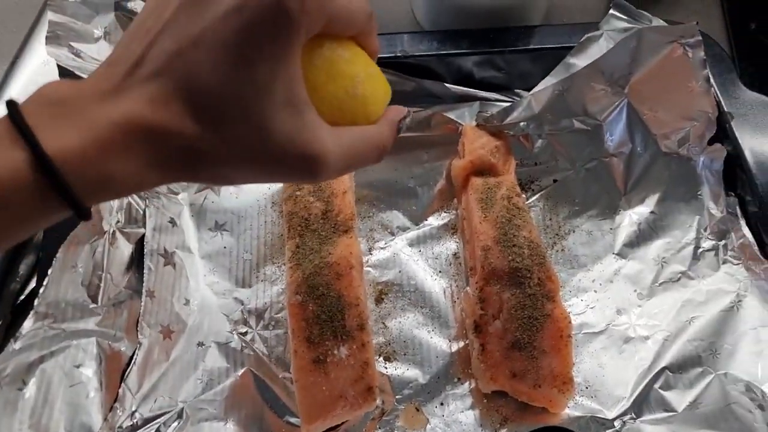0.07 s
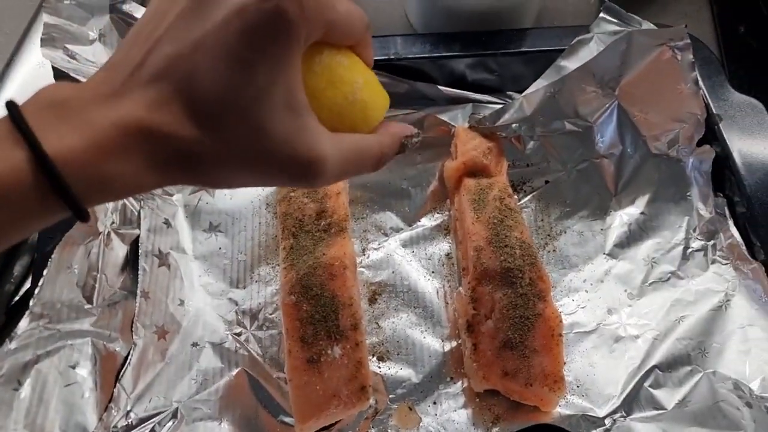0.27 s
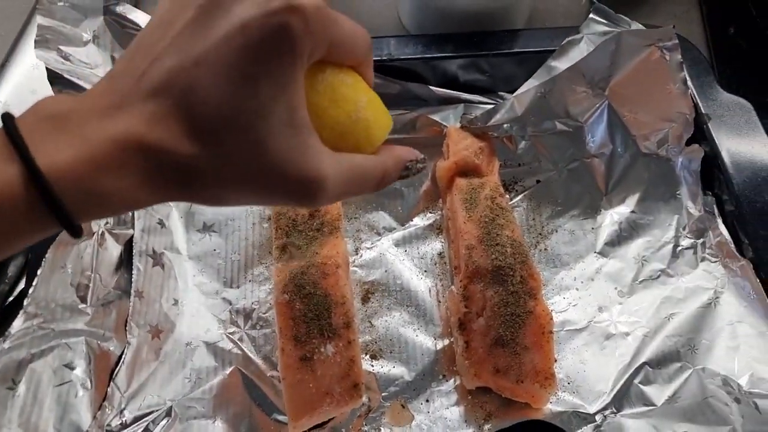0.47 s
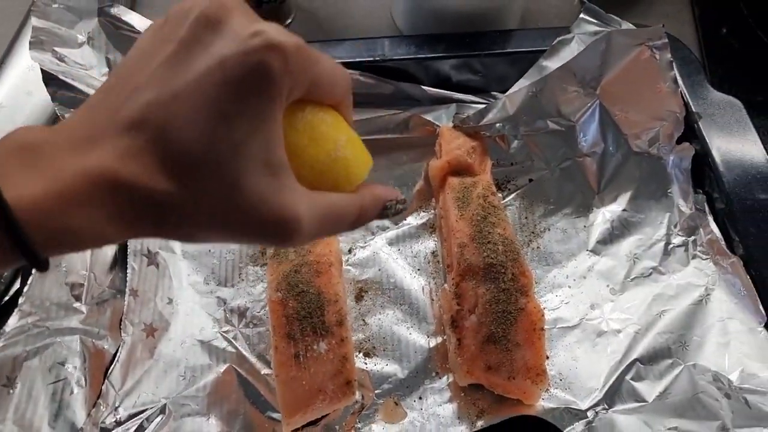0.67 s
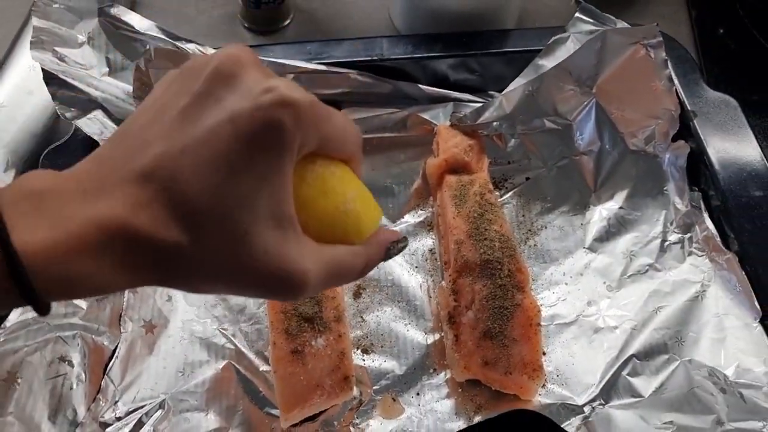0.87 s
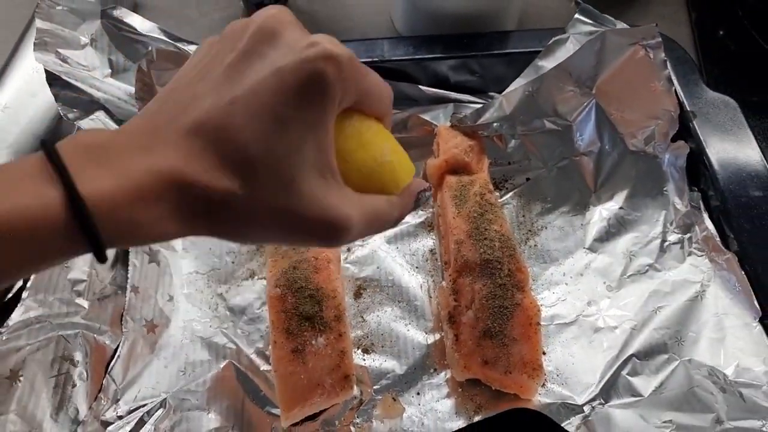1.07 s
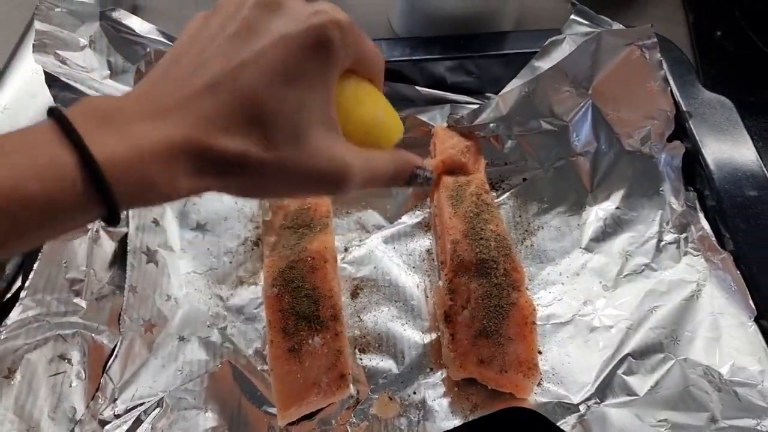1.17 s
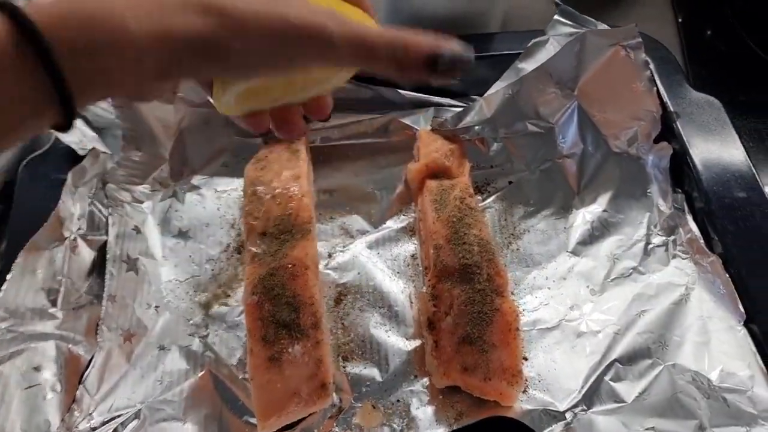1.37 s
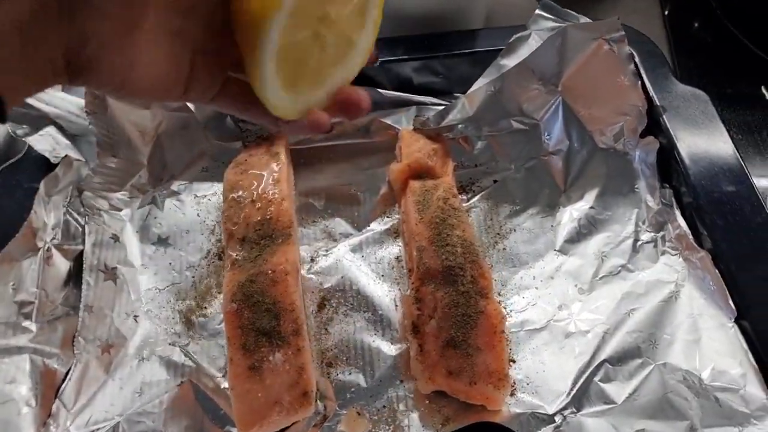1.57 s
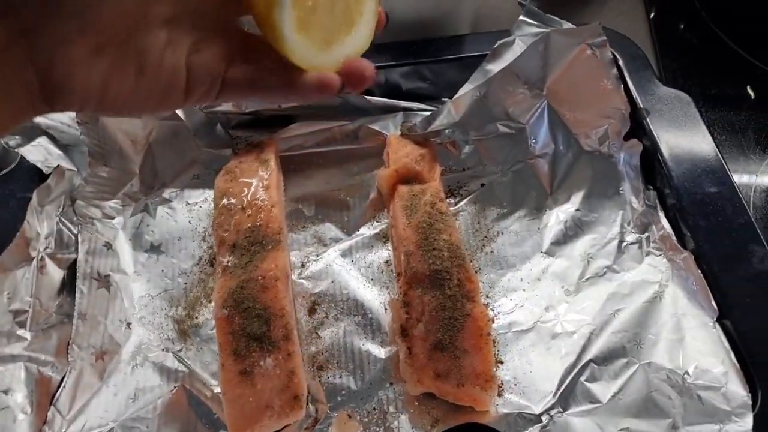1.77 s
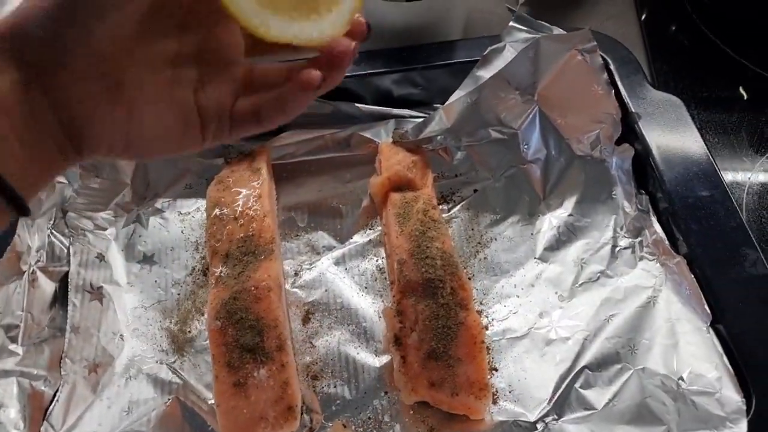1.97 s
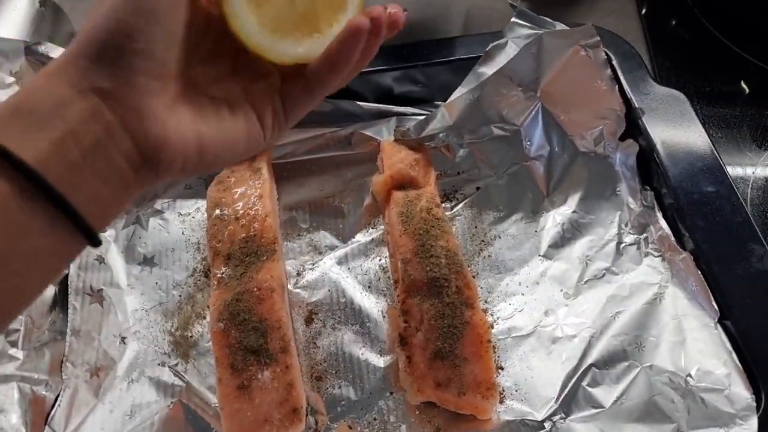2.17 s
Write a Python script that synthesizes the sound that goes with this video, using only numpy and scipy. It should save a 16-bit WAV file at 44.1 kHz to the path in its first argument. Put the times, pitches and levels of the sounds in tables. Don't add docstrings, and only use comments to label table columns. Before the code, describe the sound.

Lemon juice drips and crackles onto crumpled aluminium foil in a tray, over a faint low hum

```python
import sys
import numpy as np
from scipy import signal
from scipy.fft import rfft, irfft, next_fast_len
from scipy.io import wavfile
from scipy.ndimage import uniform_filter1d, map_coordinates

SR = 44100
rng = np.random.default_rng(int(sys.argv[2]) if len(sys.argv) > 2 else 0)


def dump(signal):
    limited = np.clip(np.atleast_2d(signal).T, -1, 1)
    pcm = np.round(limited * 32767).astype(np.int16)
    wavfile.write(sys.argv[1], SR, pcm)


def boost_factor(decibels):
    exponent = np.asarray(decibels, float) / 20
    return 10 ** exponent


N = 98254
SPAN = SR * 2 // 5

# multiple_of_motor_hz, level_db
MOTOR_LINES = [(1, -62), (3, -56), (4, -81), (5, -81.5), (6, -91.5), (9, -79), (11, -79), (12, -83.5),
               (13, -89.5), (14, -92.5)]
# pitch_hz, width_hz, level_db
ROOM_MODES = [(33, 5, -5), (53.7, 7, -3), (77, 7, 0), (98, 12, -9), (133, 22, -19), (345, 9, -25)]
# pitch_hz, likeness_0_to_1
LIKENESS = [(30, .93), (60, 1), (130, .94), (290, 0.6), (640, 0.62), (2000, 0.061)]
# pitch_hz, level_db_per_hz
MURMUR = [(110, -110), (160, -99), (250, -99), (400, -95.5), (630, -103), (1000, -107), (1600, -112)]
# pitch_hz, level_db_per_hz
HISS_CURVE = [(900, -125), (1300, -111), (2000, -115), (3000, -115), (5500, -117), (7400, -129),
              (9000, -128), (10500, -134), (13300, -137), (15500, -132)]
# time_s, level_db
SQUEEZE_LEVEL = [
    (0.0, -47),
    (0.658, -41),
    (0.77, -42),
    (0.9, -47),
    (0.98, -39.5),
    (1.118, -65),
    (1.244, -70),
    (1.45, -78),
]
# pitch_hz, share_0_to_1
SHARED_PART = [(500, 0.87), (1500, 0.52), (4000, 0.23), (12000, 0.12)]
# pitch_hz, t60_s
KITCHEN_T60 = [(500, .38), (3000, .32), (8000, .28), (15000, .2)]
# start_s, level_db, spread_s, foil_note_hz, brightness_db
FOIL_DROPS = [(0.0014, -42.5, 0.03, 2030, -1), (0.032, -34.5, 0.034, 5050, -5.5),
              (0.1143, -35.5, 0.019, 2340, -1.5), (0.2052, -35, 0.0077, 2370, 2),
              (0.2732, -42, 0.016, 3050, -23), (0.3413, -25.5, 0.0036, 1750, 7),
              (0.401, -28.5, 0.022, 4160, 5.5), (0.4236, -32, 0.0093, 5160, -2),
              (0.5155, -29.5, 0.026, 4970, 7.5), (0.5342, -33.5, 0.024, 3040, 2.5),
              (0.663, -29.5, 0.012, 3000, 9), (1.4022, -50, 0.01, 2010, -6), (1.4605, -40, 0.022, 1960, 0),
              (1.5509, -40.5, 0.02, 3950, 6), (1.5654, -27, 0.0019, 4720, 9),
              (1.5804, -38.5, 0.0038, 3030, 7.5), (1.6357, -59, 0.008, 6000, 10),
              (1.8476, -41.5, 0.007, 2190, 1.5), (1.884, -54, .005, 7000, 18),
              (1.903, -61, 0.0031, 8000, 19), (0.6, -47, 0.0055, 2810, 0)]
# start_s, level_db, spread_s, foil_note_hz, brightness_db
FOIL_RUNNELS = [
    (0.091, -38, 0.023, 2980, 9),
    (0.156, -29, 0.0086, 5000, -3.5),
    (0.252, -32.5, 0.01, 2724, 8),
    (.32, -30.5, 0.034, 3480, -2),
    (0.584, -37, 0.031, 2700, 0),
    (0.797, -25.5, 0.019, 2700, 0),
    (1.329, -44, 0.0055, 2000, -5),
    (1.359, -57.5, 0.031, 3980, 0),
    (1.499, -48, 0.0083, 2560, 8),
    (1.835, -43.5, 0.015, 1950, -18),
]
# pitch_hz, level_db_per_hz
FOIL_TONE = [(180, -43), (300, -11), (590, -18.5), (708, -6), (849, -11.5), (1730, -6.5), (3070, -2.5),
             (7750, -6), (15500, -21.5)]
# start_s, level_db, pitch_hz, t60_s
DENT_POPS = [(0.049, -51.5, 1155, 0.12), (0.342, -40.5, 1786, 0.078), (.345, -44, 1230, 0.064),
             (.345, -65, 780, .04), (.36, -48, 2060, 0.051), (.42, -50.5, 2057, 0.066),
             (.425, -49, 1094, 0.046), (.425, -60, 694, 0.044), (.522, -64, 990, 0.034),
             (.527, -43.5, 2280, 0.042), (.548, -58, 714, 0.054), (.555, -50, 1200, 0.079),
             (.563, -47.5, 1690, 0.053), (.665, -43, 3150, 0.036), (.718, -52, 1170, 0.037),
             (0.744, -41.5, 1164, 0.07), (.746, -48, 732, 0.051), (.748, -43.5, 1340, 0.057),
             (.804, -40, 2750, 0.037), (.8148, -27.5, 4900, 0.03), (0.8139, -28.5, 2620, 0.033),
             (.822, -47, 1250, .06), (0.8885, -36, 5010, 0.021), (.891, -47.5, 1200, 0.08),
             (1.193, -52.5, 2940, 0.055), (1.27, -64, 4930, 0.02), (1.282, -51, 6320, .02),
             (1.29, -55, 4870, 0.026), (.058, -48, 2180, .05), (.115, -57, 2700, .04),
             (.342, -47, 3970, .03), (.515, -41.5, 4970, .03), (.95, -38, 5000, .03),
             (1.005, -55, 5000, .03), (1.18, -56, 14600, .02), (1.195, -60, 9500, .015),
             (1.205, -54, 9000, .015), (1.179, -58, 7000, .02), (0.171, -52, 1160, .05),
             (.09, -54, 1144, 0.066), (.055, -57, 520, .05), (1.48, -62, 520, .05),
             (1.336, -65, 1994, 0.05), (1.402, -70.5, 2030, 0.15), (1.465, -59, 1987, 0.12),
             (1.475, -58, 1616, .07), (1.565, -45.5, 1750, 0.07), (1.568, -54, 1045, .04),
             (1.572, -49.5, 1990, 0.089), (1.574, -47, 3335, 0.076), (1.597, -61, 940, 0.055),
             (1.608, -58, 2720, 0.076), (1.849, -61, 2130, 0.032)]
# start_s, level_db, spread_s, low_ring_db, brightness_db
DROPS_ON_TRAY = [(0.7444, -31.5, 0.02, 18.5, 0.5), (0.7854, -32.5, 0.019, -14, 9),
                 (0.814, -22, 0.0067, 9, 10), (0.8224, -27, 0.0047, 11, -30), (0.8901, -28.5, 0.015, 1, -2),
                 (0.9142, -31, 0.023, 5, -6), (0.9473, -33, 0.016, 17, 2), (0.971, -35.5, 0.019, -6, -5),
                 (1.0042, -35.5, 0.014, 11, -1), (1.0404, -36.5, 0.017, 1, -24),
                 (1.0548, -33, 0.0083, 10, 1.5), (1.0795, -38.5, 0.0063, -2, 8),
                 (1.1697, -47, 0.0093, -12, -6.5), (1.178, -43, 0.005, -27, 5),
                 (1.1935, -42.5, 0.0045, -16, 7), (1.2048, -45.5, 0.005, -26, 6),
                 (1.2448, -50.5, 0.0097, -6, -4), (1.28, -55.5, 0.01, -20, -1),
                 (1.095, -51, 0.0089, 0, -17)]
# pitch_hz, level_db_per_hz
TRAY_TONE = [(180, -51), (300, -20), (821, -16.5), (1160, -12.5), (1490, -10.5), (2610, -5.5), (4000, -6),
             (4960, -5.5), (15500, -20.5)]
# pitch_hz, width_hz, level_db
TRAY_NOTES = [(1200, 190, -6), (2700, 500, -16.5), (4800, 390, -4)]
# pitch_hz, left_over_right_db
BALANCE = [(60, 5), (150, -7), (380, -1.5), (950, 2.5), (2380, -2), (5980, -0.5), (15000, 0)]

ROOM_DB = -5.5
BRIGHT_HZ = 6950
ATTACK_S, SWELL_S = 0.00089, 0.015


def unit(x):
    return x / np.sqrt(np.mean(x ** 2, axis=-1, keepdims=True) + 1e-20)


def along(points, hz):
    pitch, value = np.transpose(points)
    return np.interp(np.log(hz + 1), np.log(pitch + 1), value)


def peak(f, hz, width):
    return 1j * f * width / (hz * hz - f * f + 1j * f * width)


def wobble(rate):
    bends = rng.standard_normal(int(N * rate / SR) + 4)
    return map_coordinates(bends, [np.arange(N) * rate / SR])


def filtered(x, response):
    size = next_fast_len(x.shape[-1] + SR // 2)
    spectrum = rfft(x, size) * response(np.fft.rfftfreq(size, 1 / SR))
    return irfft(spectrum, size)[..., :x.shape[-1]]


def stereo(response):
    def mid_and_side(hz):
        turn = np.arccos(np.clip(along(LIKENESS, hz), -1, 1)) / 2
        return response(hz) * [np.cos(turn), np.sin(turn)]

    mid, side = filtered(rng.standard_normal((2, N)), mid_and_side)
    return np.array([mid + side, mid - side])


def machine():
    motor_hz, unsteady_db, boom_db = 33.31, 2.5, -50.5
    t = np.arange(N) / SR
    hum = np.zeros(N)
    for multiple, db in MOTOR_LINES:
        level = np.sqrt(2) * boost_factor(db + unsteady_db * wobble(8.6))
        hum += level * np.sin(2 * np.pi * (multiple * motor_hz * t + rng.random()))
    modes = lambda f: sum(boost_factor(db) * np.abs(peak(f, hz, width)) ** 2 for hz, width, db in ROOM_MODES)
    return hum + boost_factor(boom_db) * unit(stereo(modes))


def air():
    murmur = stereo(lambda f: boost_factor(along(MURMUR, f)) / (1 + (f / 1800) ** 4))
    hiss = stereo(lambda f: boost_factor(along(HISS_CURVE, f)))
    return np.sqrt(SR / 2) * (murmur + hiss)


def ports(near, apart):
    lead_s = 0.0003943
    share = lambda f: np.clip(along(SHARED_PART, f), 0, 1)
    shift = lambda f: np.exp(1j * np.pi * lead_s * np.outer([1, -1], f))
    common = filtered(near, lambda f: np.sqrt(share(f)) * shift(f))
    return common + filtered(apart, lambda f: np.sqrt(1 - share(f)))


def spray():
    rate, centre_hz, pitch_spread, cycles, size_db, spray_db = 1300, 6000, 0.661, 5.1, 1.5, -15
    s, level_db = np.transpose(SQUEEZE_LEVEL)
    count = int(rate * s[-1])
    when, pitch, size = rng.random((3, 3, 1500))[:, :, :count, None]
    start = (when * s[-1] * SR).astype(int)
    hz = np.clip(centre_hz * np.exp(pitch_spread * 4.01 * (pitch - .5)), 800, 15500)
    k = np.arange(256)
    strength = boost_factor(-size_db * np.log(size + 0.00064))
    ticks = strength * np.exp(-k * hz / SR / cycles) * np.sin(2 * np.pi * hz * k / SR)
    rain = unit(np.array([np.bincount((a + k).ravel(), b.ravel(), N) for a, b in zip(start, ticks)]))
    return ports(rain[0], rain[1:]) * boost_factor(spray_db + np.interp(np.arange(N) / SR, s, level_db))


def kitchen():
    hz, t, z = signal.stft(rng.standard_normal((2, SPAN)), SR, nperseg=256)
    fade = boost_factor(-60 * t / along(KITCHEN_T60, hz)[:, None])
    tail = signal.istft(z * fade, SR, nperseg=256)[1]
    return tail / np.linalg.norm(tail[0])


def creases(f):
    low_hz, high_hz, crease_db, width = 588, 6310, -4, .04
    where, size = rng.random((2, 14))
    pitch = low_hz * (high_hz / low_hz) ** where
    return 1 + sum(boost_factor(crease_db) * a * peak(f, hz, width * hz) for hz, a in zip(pitch, size))


def sheen(f, bright_db):
    return boost_factor(bright_db * f * f / (f * f + BRIGHT_HZ ** 2))


def splash(rise, spread, t60, colour):
    spiky_db, spiky_top_db, clump_db = 5, 14, 2.5
    strike_db, strike_s = -0.5, 0.0029
    treble_life = 0.69
    t = np.arange(SPAN) / SR
    strike = np.exp(-t / strike_s)
    clumps = unit(uniform_filter1d(rng.standard_normal(SPAN), size=90))
    spike_db = np.minimum(spiky_db * rng.exponential(size=SPAN), spiky_top_db)
    spike_db = spike_db + clump_db * clumps * (0.5 - strike)
    spikes = unit(boost_factor(spike_db) * rng.standard_normal((3, SPAN)))
    crackle = ports(spikes[0], spikes[1:]) * (1 - np.exp(-t / rise)) * (1 + boost_factor(strike_db) * strike)

    after = np.maximum(t - spread, 0)
    low = filtered(crackle, lambda f: 1 / (1 + (f / BRIGHT_HZ) ** 2))
    treble = crackle - low
    crackle = low * boost_factor(-60 * after / t60) + treble * boost_factor(-60 * after / (t60 * treble_life))

    power = np.mean(np.abs(colour(np.linspace(0, SR / 2, 999))) ** 2)
    direct = filtered(crackle, lambda f: colour(f) * creases(f)) / np.sqrt(power)
    late = np.pad(direct, ((0, 0), (200, 0)))
    return direct + boost_factor(ROOM_DB) * signal.fftconvolve(late, kitchen(), axes=1)[:, :SPAN]


def loose_foil(table, rise):
    foil_db, t60, note_db, note_width = -10, 0.091, -5, .15
    out = np.zeros((2, N + SPAN))
    for s, db, spread, note_hz, bright_db in table:
        note = lambda f: 1 + boost_factor(note_db) * peak(f, note_hz, note_width * note_hz)
        colour = lambda f: boost_factor(along(FOIL_TONE, f)) * sheen(f, bright_db) * note(f)
        out[:, round(s * SR):][:, :SPAN] += boost_factor(db + foil_db) * splash(rise, spread, t60, colour)
    return out[:, :N]


def dent_pops():
    blur, room_db = .02, -7.5
    out, t = np.zeros((3, N + SPAN)), np.arange(SPAN // 2) / SR
    for s, db, hz, t60 in DENT_POPS:
        detune, phase = rng.standard_normal((2, 3, 3, 1))
        detune = detune - detune.mean(axis=1, keepdims=True)
        notes = np.sin(2 * np.pi * hz * (1 + blur * detune) * t + 3 * phase).sum(axis=1)
        fade = (1 - np.exp(-t / ATTACK_S)) * boost_factor(db - 60 * t / t60)
        out[:, round(s * SR):][:, :len(t)] += notes * fade
    direct = ports(out[0, :N], out[1:, :N])
    return direct + boost_factor(room_db) * signal.fftconvolve(direct, kitchen(), axes=1)[:, :N]


def tray_drops():
    tray_db, t60, scatter = -12, .11, .05
    out = np.zeros((2, N + SPAN))
    for s, db, spread, low_db, bright_db in DROPS_ON_TRAY:
        off = 1 + scatter * rng.standard_normal(len(TRAY_NOTES))

        def colour(f):
            ring = 1
            for k, (hz, width, note_db) in enumerate(TRAY_NOTES):
                extra_db = low_db if k == 0 else 0
                ring = ring + boost_factor(note_db + extra_db) * peak(f, hz * off[k], width)
            return boost_factor(along(TRAY_TONE, f)) * sheen(f, bright_db) * ring

        out[:, round(s * SR):][:, :SPAN] += boost_factor(db + tray_db) * splash(ATTACK_S, spread, t60, colour)
    return out[:, :N]


def scene():
    juice = spray() + loose_foil(FOIL_DROPS, ATTACK_S) + loose_foil(FOIL_RUNNELS, SWELL_S)
    juice = juice + dent_pops() + tray_drops()
    juice = filtered(juice, lambda f: boost_factor(np.outer([.5, -.5], along(BALANCE, f))))
    return machine() + air() + juice


def roll_off(x):
    return signal.sosfilt(signal.butter(12, 16830, fs=SR, output="sos"), x)


def record(dry):
    top_hz, bump_hz, bump_width_hz, bump_db = 15750, 13500, 1340, 3
    bump = lambda hz: 1 + boost_factor(bump_db) * np.abs(peak(hz, bump_hz, bump_width_hz)) ** 2
    mix = filtered(dry, lambda hz: (hz < top_hz) * bump(hz))
    return roll_off(mix)


dry = scene()
out = record(dry)
dump(out)
```